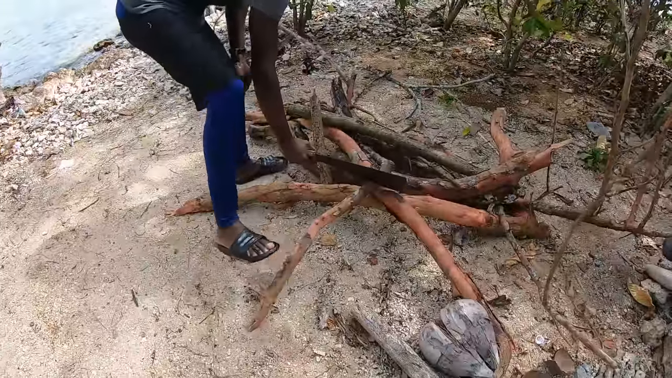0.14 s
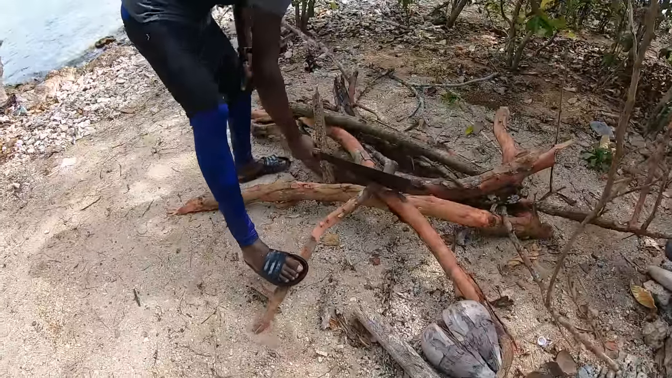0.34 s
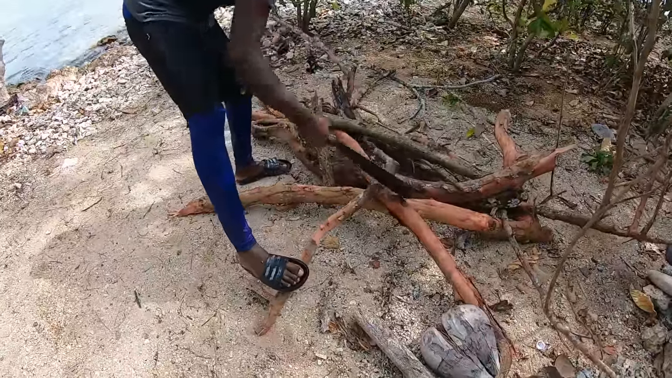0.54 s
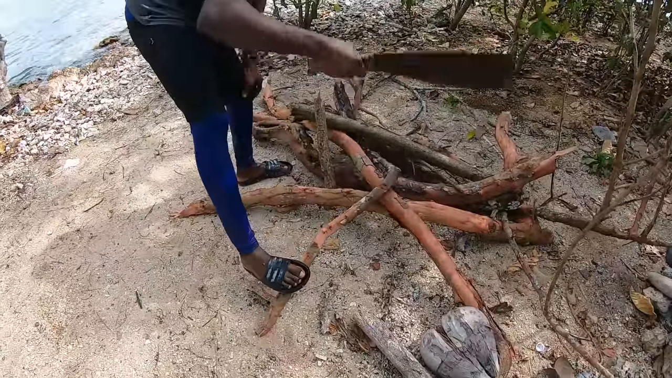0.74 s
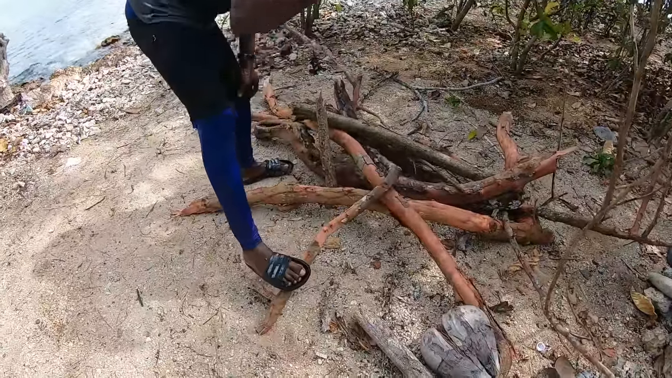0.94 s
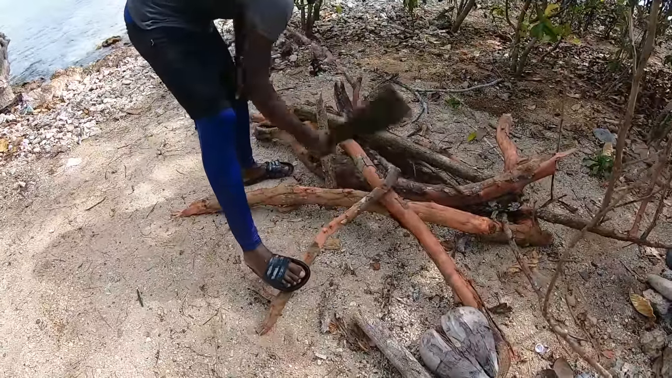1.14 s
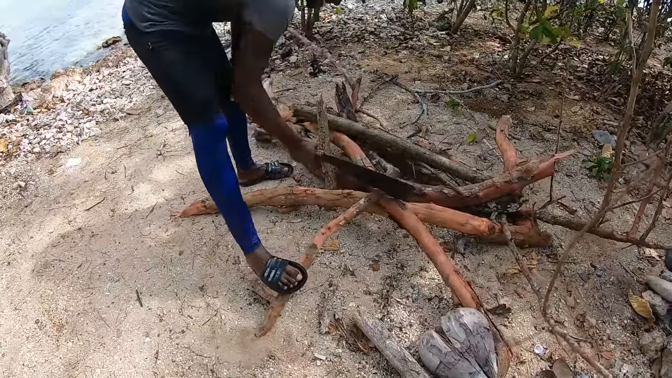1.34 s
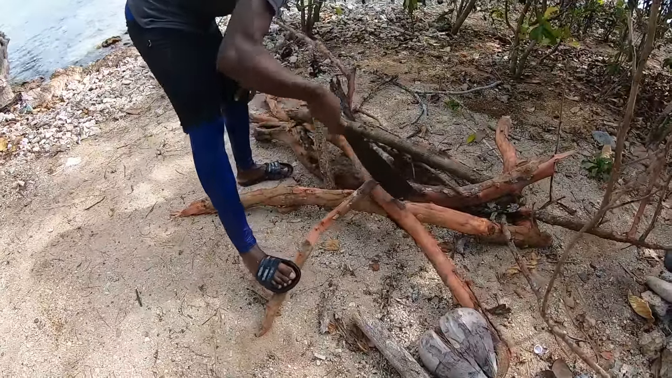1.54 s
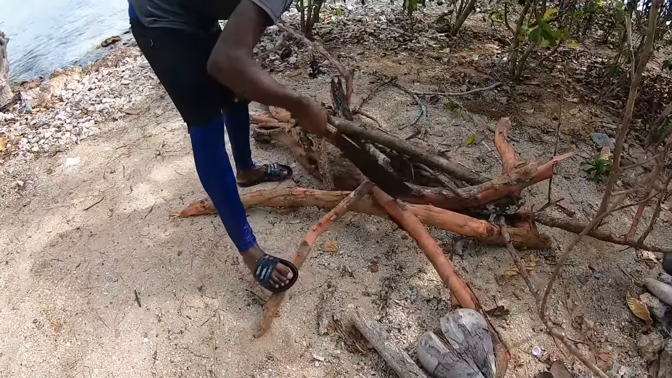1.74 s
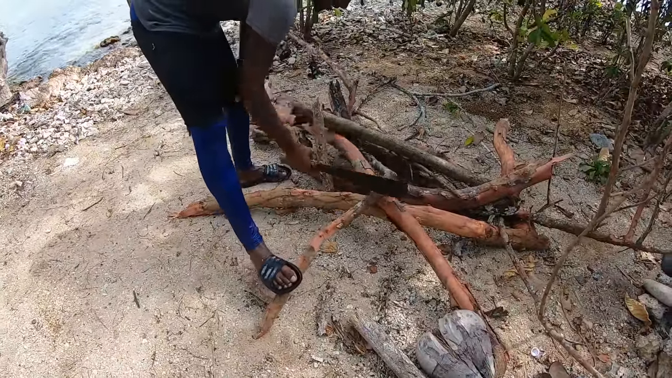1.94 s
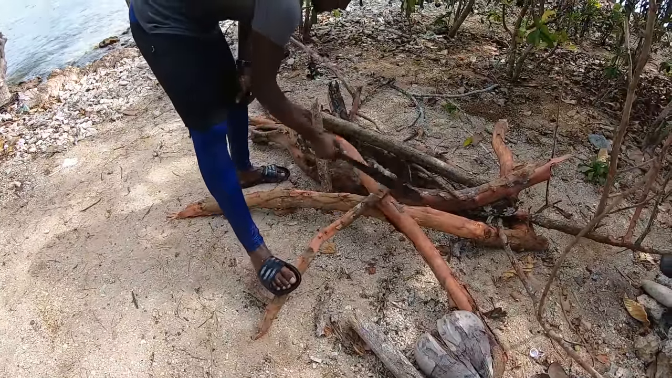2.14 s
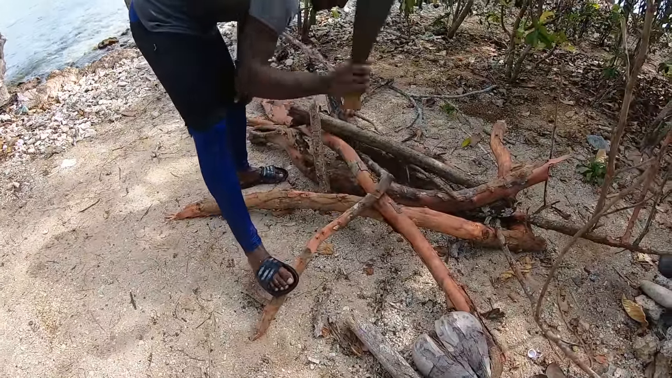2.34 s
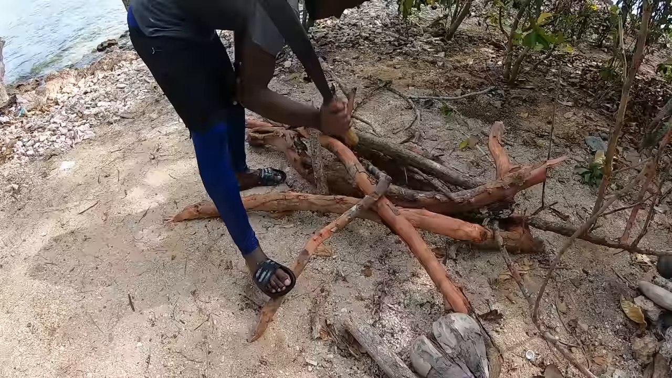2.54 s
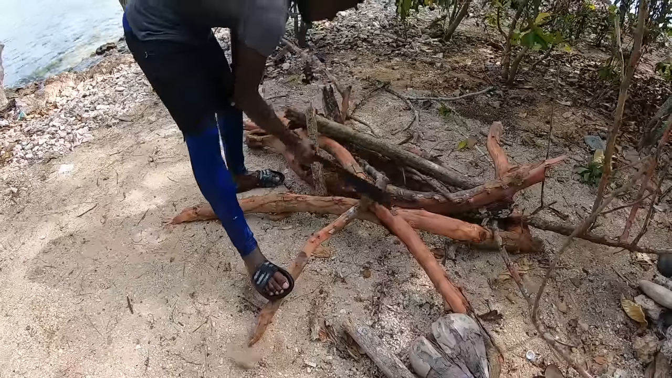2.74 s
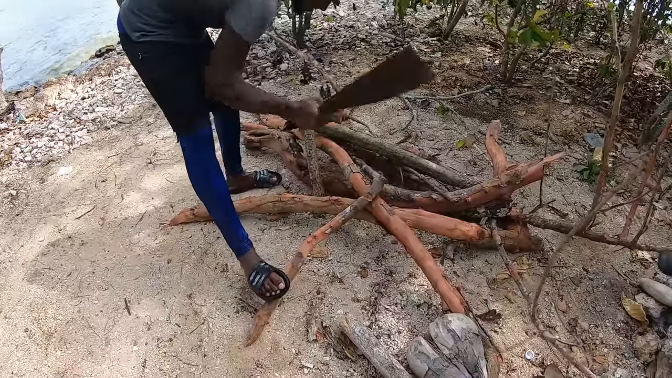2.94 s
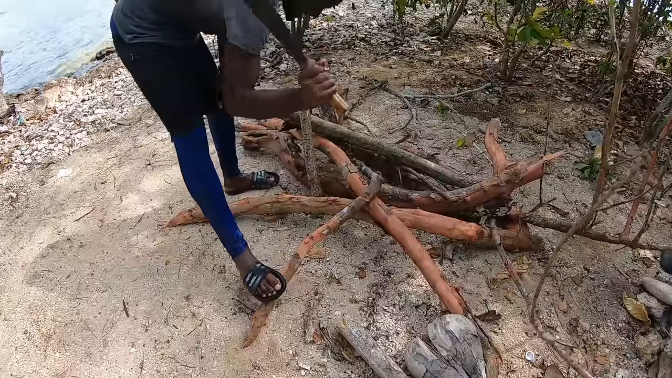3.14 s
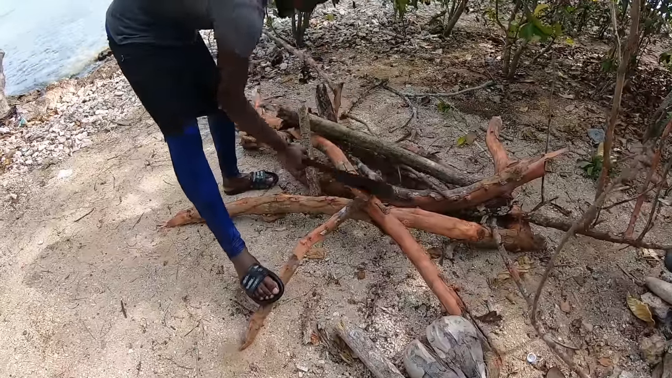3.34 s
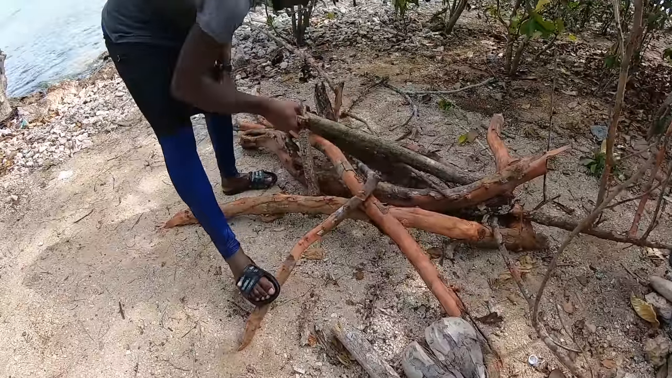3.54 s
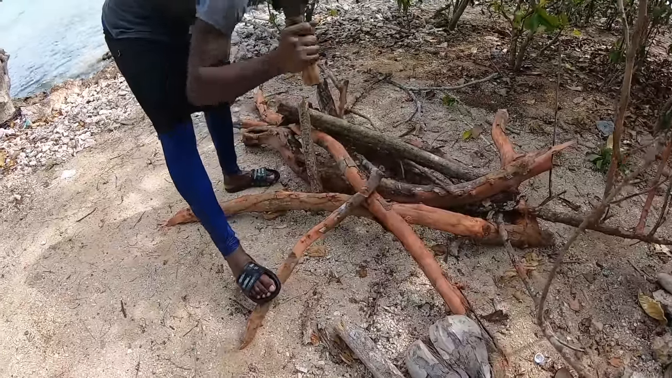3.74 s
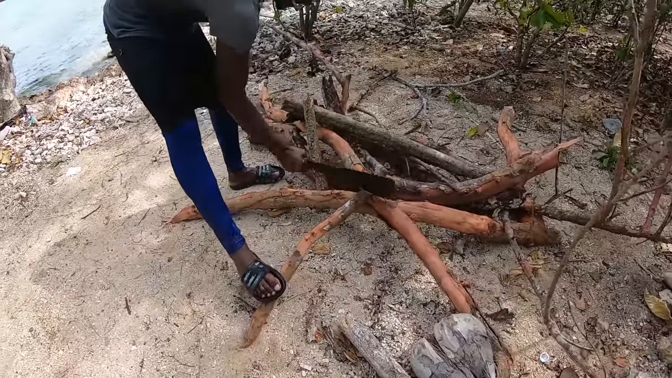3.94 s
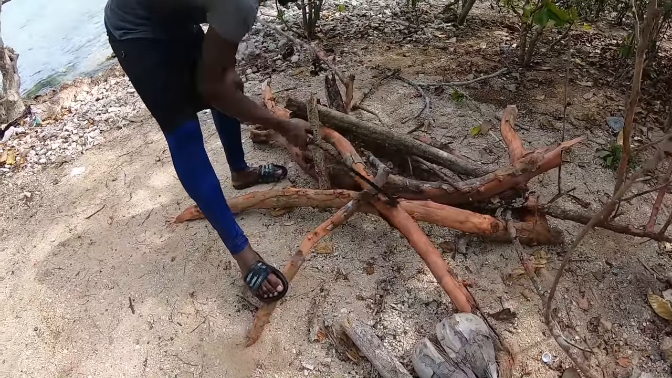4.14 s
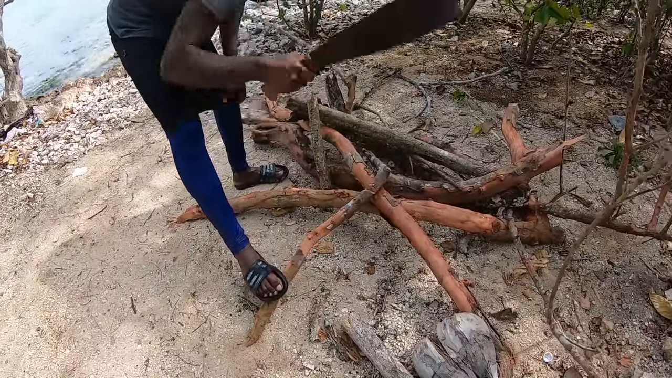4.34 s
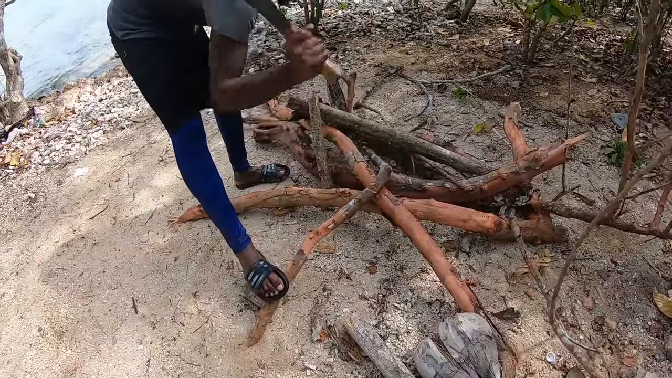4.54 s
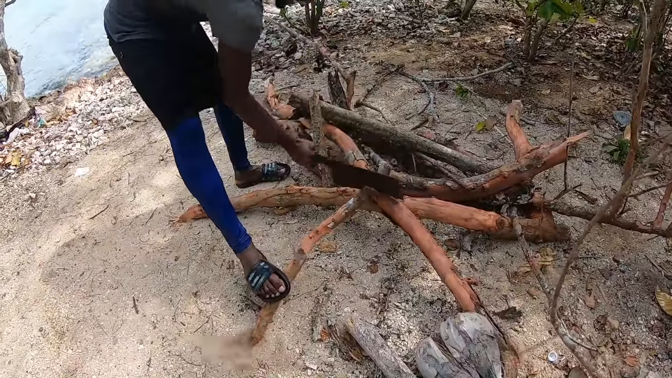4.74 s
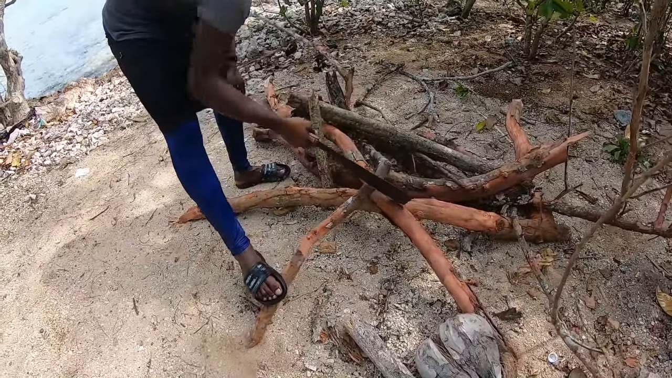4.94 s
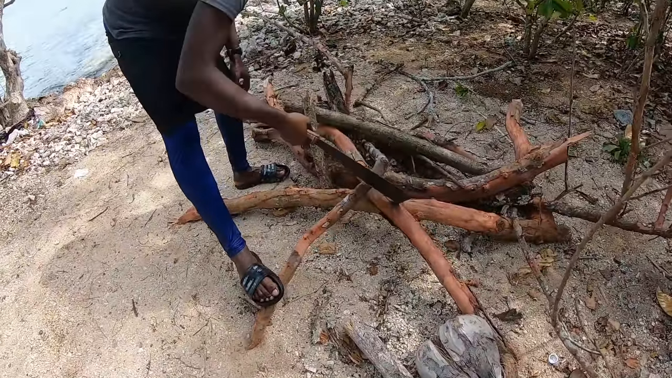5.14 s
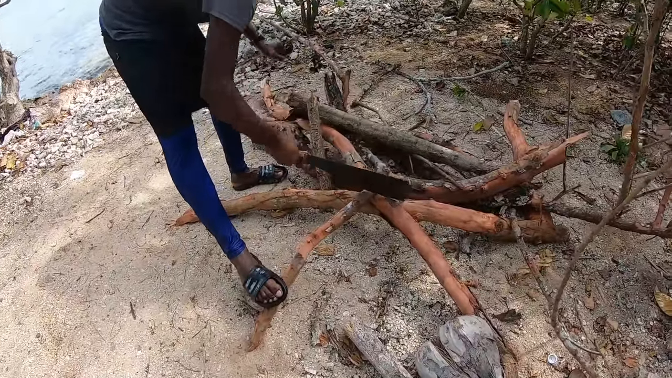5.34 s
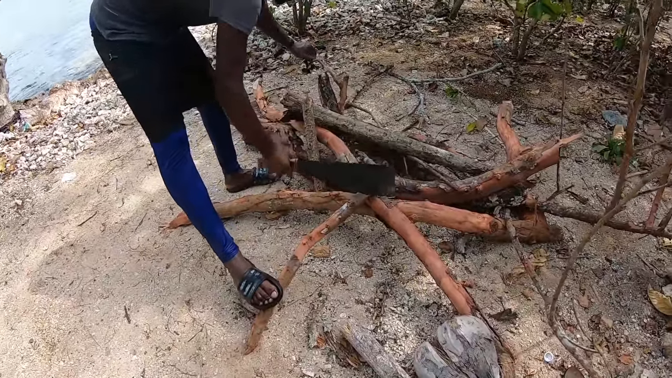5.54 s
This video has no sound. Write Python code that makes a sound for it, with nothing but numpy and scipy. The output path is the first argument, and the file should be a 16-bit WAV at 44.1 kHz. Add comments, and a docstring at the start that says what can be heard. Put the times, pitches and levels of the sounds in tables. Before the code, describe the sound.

Dry branches are handled on a sandy shore, about two metres from the microphone. For the first second twigs tick and snap, with wooden knocks near 0.2 and 0.7 seconds. At 1.3 seconds a machete lands a loud chop: a sharp crack, a woody knock, a low thud and a very short metallic ring. Faint ticks, a tap and light scrapes of steel on bark follow until about 2.3 seconds. Four strong, evenly spaced chops come at 2.7, 3.4, 4.1 and 4.8 seconds, the second with an especially bright crack. Each rings briefly, scatters chips and stirs the leaves. Small snaps and taps fall between them, and a lighter knock comes at 5.5 seconds. Faint surf, leaf rustle and low wind rumble run underneath. The sound starts almost centred and widens to stereo after two seconds, with the chopping slightly left.

```python
"""On a sandy shore, a machete chops a pile of dry branches two metres from a pair of microphones.
Each stroke excites damped modes of the wood, the ground and the steel, while breaking fibres and
flying chips radiate broadband noise. Twigs tick and the blade scrapes bark over surf, leaves and wind.
The sound starts almost centred and slowly opens to stereo after two seconds."""
import sys
import numpy as np
from scipy import signal
from scipy.fft import rfft, irfft, next_fast_len
from scipy.io import wavfile
from scipy.ndimage import uniform_filter1d

SR = 44100
rng = np.random.default_rng(int(sys.argv[2]) if len(sys.argv) > 2 else 0)


def put_to_file(sound):
    """Save the sound as 16-bit audio at rate SR, in the file named by the first command-line argument."""
    columns = np.atleast_2d(sound).T  # one column per channel
    safe = np.clip(columns, -1, 1)
    whole_steps = np.round(safe * 32767)
    wavfile.write(sys.argv[1], SR, whole_steps.astype(np.int16))


N = 246078

# noise spectra (frequency [Hz], relative spectral density [dB])
SURF_SPECTRUM = [(53, -25), (90, -7.5), (170, 7), (320, -1), (600, -3), (1200, -5), (2340, -10.5),
                 (5000, -24.5), (9700, -37), (15600, -72)]
LEAF_SPECTRUM = [(1500, -36), (3000, 6.5), (5000, -2), (6500, -1), (8500, -3.5), (11000, -5.5),
                 (15500, -21)]
WIND_SPECTRUM = [(20, -24), (40, -6.5), (68, -0.5), (95, -4.5), (200, -18), (400, -61)]
SWELL_SPECTRUM = [(410, -38), (700, -16), (1050, -38), (1550, -1.5), (2310, -19.5), (2600, -8.5),
                  (3200, -18.5), (4040, -15), (4790, -28), (7450, -5), (9530, -17), (10000, -23),
                  (11300, -9), (15600, -42)]
CRACK_SPECTRUM = [(700, -11), (1200, -5), (2500, -13.5), (3400, -7), (5100, -9), (6800, -16), (8000, -14.5),
                  (9600, -12.5), (11000, -18), (15600, -24)]
CHIP_SPECTRUM = [(470, -53), (800, -9), (2000, 0), (3100, -5), (6000, -3.5), (9400, -3.5), (11000, -7),
                 (15600, -19)]
# background envelopes (time [s], surf level [dB], leaf level [dB])
SHORE_LEVELS = [(0, -42.5, -55), (.64, -41, -51), (.74, -37.5, -41.5), (.93, -42.5, -54.5),
                (1.25, -42, -53.5), (1.45, -48, -56.5), (2.02, -46, -55), (2.25, -47, -59.5),
                (2.7, -46, -57), (3.01, -49, -64), (3.3, -47.5, -57.5), (3.6, -47.5, -57.5),
                (4.05, -44.5, -54), (4.27, -53.5, -65), (4.75, -46, -54.5), (4.98, -53, -61),
                (5.3, -53, -56.5), (5.58, -47, -54.5)]
# wind on the microphones (time [s], level [dB])
GUSTS = [(0, -46), (.2, -54.5), (.8, -49.5), (1.04, -45), (1.17, -40), (1.36, -59.5), (2.0, -51),
         (2.3, -58), (2.43, -44), (2.55, -40), (2.68, -54), (3.1, -49), (3.35, -56), (3.9, -55),
         (4.2, -48.5), (4.45, -59.5), (5.0, -62.5), (5.58, -53)]
# spells of handling (start [s], end [s], ticks [count], typical level [dB], typical frequency [Hz])
HANDLING = [(0, 0.899, 26, -42, 3000), (1.501, 2.597, 7, -47.5, 4000), (3.556, 4.7, 6, -46, 7000),
            (5.05, 5.403, 10, -46.5, 8500)]
# the loudest snaps and ticks, including the bright top of the third chop's crack
# (time [s], level [dB], centre frequency [Hz], T60 [s])
SNAPS = [(0.1443, -30.5, 3830, 0.037), (.269, -33.5, 2320, .03), (.346, -34, 2330, 0.13),
         (0.353, -33.5, 5750, 0.082), (.385, -29, 2470, 0.034), (.399, -30, 1800, 0.087),
         (0.4511, -33, 1950, .021), (0.569, -38.5, 9000, .046), (.608, -37, 3000, 0.02),
         (.624, -35, 2940, 0.035), (.694, -36, 3460, 0.066), (.727, -32.5, 5000, .05),
         (0.785, -29, 3270, 0.067), (.8362, -33.5, 3870, .05), (1.628, -41, 3940, 0.027),
         (1.789, -41, 1470, 0.04), (2.018, -39.5, 2960, 0.08), (2.9498, -37.5, 1640, 0.023),
         (3.3834, -10.5, 8700, 0.03), (3.573, -35, 3280, 0.02), (4.145, -34, 3260, 0.039),
         (4.169, -38, 3080, .03), (4.2624, -41, 3300, 0.031), (4.9821, -31.5, 7040, .028),
         (4.995, -40.5, 2180, 0.063), (5.013, -41, 7000, .03), (5.0235, -33.5, 7200, .028),
         (5.379, -37, 9200, .023), (5.447, -40.5, 7400, 0.1), (5.4755, -34.5, 2540, 0.032),
         (5.5, -41.5, 3900, .04)]
# the blade drags over bark (start [s], duration [s], frequency [Hz], level [dB])
SCRAPES = [(0.715, 0.018, 6300, -36), (1.547, 0.026, 2700, -50.5), (1.915, 0.088, 2980, -53.5),
           (1.997, 0.034, 5340, -57), (2.167, 0.056, 5350, -57), (2.19, 0.065, 2700, -52)]
# hiss just before two of the loud hits (end [s], duration [s], final level [dB])
SWELLS = [(1.294, .028, -12.5), (2.752, 0.031, -22)]
# modes of the pile on the sand, the steel and the branches (frequency [Hz], level [dB], T60 [s])
GROUND_MODES = [(50.6, -20.5, 0.32), (82, -18.5, 0.23), (123, -11.5, 0.19), (156, 0.5, 0.11),
                (186.5, 2, 0.084)]
BLADE_MODES = [(1448, 8, .11), (1828, -3, .25), (2654, -1, .2), (3047, -2, .35), (3520, -6, .2),
               (4670, -6, .3), (5045, -8, .3), (5930, -5, .25), (7005, -4, .3), (8850, -8, .12)]
WOOD_MODES = [(215, -1, .06), (262, 0, .07), (325, 0, .065), (414, 1, .065), (480, -4, .05),
              (566, -1, .075), (657, -3, .07), (768, -3, .07), (878, -1, .07), (1035, -3, .05),
              (1135, 0, .05), (1290, -3, .035), (1450, 0, .05), (1706, -2, .035), (1832, -2, .035),
              (2100, -5, .025), (2560, -3, .025)]
# reflections from nearby trunks and the bank (delay [ms], gain [dB])
ECHOES = [(15.5, -30.5), (23.0, -17.5)]
# taps and branches dropping back (time [s], knock gain [dB], thud gain [dB], crack gain [dB],
# branch pitch [Hz], roll-off around that pitch [dB/octave], rattle time constant [ms])
TAPS = [(0.154, -14.5, -25, -30.5, 423, 11, 6.8), (.646, -29.5, -46, -50, 408, 25, 5.1),
        (0.7037, -9.5, -17.5, -30, 810, 5.5, 8), (2.041, -24.5, -29, -65, 633, 2.5, 6.7),
        (2.816, -35.5, -38, -51, 393, 17, 4.6), (4.131, -28, -34, -53, 566, 19, 3.8),
        (4.219, -22.5, -43, -39, 590, 14, 1.9), (5.476, -15.5, -45, -38, 606, 10, 5.1)]
# full strokes (the columns of TAPS, hum gain [dB], gain of the other blade modes [dB], free ringing [s])
CHOPS = [(1.2952, -2, -15.5, -9, 1300, 1, 0.92, -32.5, -42.5, 0.077),
         (2.7449, -12, -14, -7, 597, 1.5, 8.4, -45.5, -34.5, .18),
         (3.3834, -5.5, -15.5, -12, 388, 6, 4.6, -51, -43, 0.15),
         (4.074, -7.5, -14, -5.5, 410, 6.5, 9.5, -35.5, -47, 0.096),
         (4.7944, -5, -16, -6.5, 1100, 0.5, 4.1, -42, -44, .12)]
# side against mid in diffuse sound (frequency [Hz], gain [dB])
DIFFUSE_SIDE = [(60, -17), (200, -21.5), (500, -11), (1200, -3.5), (4000, -5), (12000, 1.5)]
# response of the capsules (frequency [Hz], gain [dB])
CAPSULE_RESPONSE = [(20, -13), (45, -1), (80, 1), (9500, -2), (11000, -9), (14300, -11.5), (15500, -22)]
# interference dips when spaced microphones are summed (frequency [Hz], gain [dB])
SUM_RESPONSE = [(5000, 1.5), (6200, -6.5), (7500, -2.5), (9500, -4.5), (10200, -5.5), (11000, 0)]
# opening from centre to stereo (time [s], side gain [ratio])
STEREO_WIDTH = [(0, 0.014), (1.95, 0.0039), (2.2, 0.3), (2.6, 0.67), (3.2, 0.99), (4.2, 1.16), (5.58, 1.12)]

PILE_PAN_DB, SNAP_PAN_DB = -3.5, -5.5  # left minus right
STIR_DB, STIR_T60_S = -49.5, 1.3
TICK_T60_S, TICK_SCATTER_DB, TICK_SCATTER_OCT = 0.02, 1, 0.35
HUM_HZ, HUM_T60_S = 2205, 1.0  # the blade's clearest mode
THUD_RISE_S, CRACK_RISE_S = 0.0095, 0.00084
CRACK_T60_S, TEAR_T60_S, TEAR_DB = 0.02, 0.083, -11
CHIP_DB, CHIP_DB_PER_CRACK_DB, CHIP_T60_S = -32.5, 0.48, 0.54
SETTLE_DB, SETTLE_MS = -21, 72  # the pile goes on shifting faintly
TREBLE_MIN_WIDTH, TREBLE_HZ, CUTOFF_HZ = 0.47, 11200, 15600


def undb(db):
    """Amplitude ratio of a level in decibels."""
    return 10 ** (np.asarray(db, float) / 20)


def unit(x):
    """Normalisation to an rms of 1."""
    return x / np.sqrt(np.mean(x ** 2))


def colour(x, points):
    """Zero-phase filtering by (frequency [Hz], gain [dB]) points joined on a log-frequency axis."""
    hz, db = np.transpose(points)
    size = next_fast_len(x.shape[-1])
    bins = np.maximum(np.arange(size // 2 + 1) * SR / size, 1)
    gain = undb(np.interp(np.log(bins), np.log(hz), db))
    return irfft(rfft(x, size) * gain, size)[..., :x.shape[-1]]


def fade(t, t60):
    """Exponential damping: 60 dB lost in t60 seconds."""
    return np.exp(-np.log(1000) * t / max(t60, .002))


def ring(t, modes, scatter_db, detune):
    """Modal superposition: each blow lands elsewhere, so the modes vary in strength and sign."""
    draws = rng.standard_normal((len(modes), 3))
    out = 0
    for (hz, db, t60), (polarity, strength, shift) in zip(modes, draws):
        amplitude = np.sign(polarity) * undb(db + scatter_db * strength)
        out += amplitude * fade(t, t60) * np.sin(2 * np.pi * hz * (1 + detune * shift) * t)
    return out


def flicker(rate_hz):
    """Random modulation: steps at the given rate, smoothed twice, with an rms of 1."""
    hold = int(SR / rate_hz)
    steps = np.repeat(rng.standard_normal(N // hold + 1), hold)
    return unit(uniform_filter1d(uniform_filter1d(steps, hold), hold)[:N])


def grit(length, spread_db):
    """Heavy-tailed noise: two independent channels of dense, uneven grains."""
    noise = rng.standard_normal((2, length))
    return unit(noise * undb(spread_db * np.minimum(rng.exponential(size=noise.shape), 6)))


def spread(mid, other):
    """Partial coherence: an independent side signal makes left and right differ."""
    side = colour(other, DIFFUSE_SIDE)
    return np.array([mid + side, mid - side])


def add(out, start_s, sound, pan_db):
    """Superposition of a sound at its start time, placed by a level difference between channels."""
    i = int(start_s * SR)
    sound = np.atleast_2d(sound)[:, :N - i]
    out[:, i:i + sound.shape[1]] += sound * undb([[pan_db / 2], [-pan_db / 2]])


def surf(t):
    """Breaking water radiates broadband noise whose octaves fluctuate slightly and independently."""
    times, levels, _ = np.transpose(SHORE_LEVELS)
    wash = colour(grit(N, spread_db=0.5), SURF_SPECTRUM)
    water = 0
    for hz in 100 * 2. ** np.arange(8):
        octave = [(hz / 2, -40), (hz / 1.515, -6), (hz, 0), (hz * 1.59, -6), (hz * 2, -40)]
        water += undb(0.26 * flicker(10)) * colour(wash, octave)
    return undb(np.interp(t, times, levels)) * spread(*unit(water))


def leaves(t):
    """Incoherent sources add in power: a background rustle and the shaking from each full stroke."""
    times, _, levels = np.transpose(SHORE_LEVELS)
    stir = sum((t > s) * fade(np.maximum(t - s, 0), STIR_T60_S) ** 2 for s, *_ in CHOPS)
    power = undb(np.interp(t, times, levels)) ** 2 + undb(STIR_DB) ** 2 * stir
    rustle = undb(flicker(40)) * colour(grit(N, spread_db=3), LEAF_SPECTRUM)
    return np.sqrt(power) * spread(*unit(rustle))


def wind(t):
    """Turbulent pressure on the microphones gives a low rumble that follows the gusts."""
    rumble = undb(1.5 * flicker(9)) * colour(rng.standard_normal((2, N)), WIND_SPECTRUM)
    return undb(np.interp(t, *np.transpose(GUSTS))) * spread(*unit(rumble))


def ticks():
    """Jittered timing: one faint tick in each equal slot of a handling spell, as rows like SNAPS."""
    rows = []
    for start, end, count, db, hz in HANDLING:
        times = start + (end - start) * (np.arange(count) + rng.random(count)) / count
        for s, (strength, shift) in zip(times, rng.standard_normal((count, 2))):
            centre_hz = hz * 2 ** (TICK_SCATTER_OCT * shift)
            rows.append((s, db + TICK_SCATTER_DB * strength, centre_hz, TICK_T60_S))
    return rows


def snaps():
    """Brittle fracture gives short, broad bands of gritty noise: twigs, and the top of one chop's crack."""
    out, t = np.zeros((2, N)), np.arange(SR // 5) / SR
    for s, db, hz, t60 in SNAPS + ticks():
        band = [(hz / 4, -20), (hz / 2, -7), (hz, 0), (hz * 1.5, -8), (hz * 3, -24), (hz * 8, -50)]
        burst = unit(colour(grit(len(t), spread_db=3), band))
        envelope = (1 - np.exp(-t / (0.02 * t60))) * fade(t, t60)
        add(out, s, undb(db) * envelope * spread(burst[0], .5 * burst[1]), SNAP_PAN_DB)
    return out


def scrapes():
    """Friction of steel on bark sings in a narrow band of noise that rises and falls."""
    out = np.zeros((2, N))
    for s, duration, hz, db in SCRAPES:
        band = [(hz * .8, -30), (hz * .96, -3), (hz, 0), (hz * 1.04, -3), (hz * 1.2, -30)]
        song = unit(colour(rng.standard_normal(SR // 5), band))
        envelope = np.hanning(int(duration * SR))
        add(out, s, undb(db) * envelope * song[:len(envelope)], pan_db=-3)
    return out


def swells():
    """Power-law growth: a short hiss swells just before two of the loud hits."""
    out = np.zeros((2, N))
    for end, duration, db in SWELLS:
        growth = np.linspace(0, 1, int(duration * SR)) ** 1.4
        hiss = unit(colour(rng.standard_normal((2, SR // 10)), SWELL_SPECTRUM))[:, :len(growth)]
        add(out, end - duration, undb(db) * growth * spread(hiss[0], .4 * hiss[1]), pan_db=-3)
    return out


def ground_thud(t):
    """The pile thumps the sand, exciting low damped modes with a soft onset."""
    onset = 1 - np.exp(-(t / THUD_RISE_S) ** 2)
    return onset * ring(t, GROUND_MODES, scatter_db=3, detune=0.018)


def blade(t, hum_db, modes_db, free_s):
    """Free vibration of the steel, shuddering in the cut until the hand or the wood damps it."""
    grip = fade(np.maximum(t - free_s, 0), t60=0.029)
    hum = undb(hum_db) * fade(t, HUM_T60_S) * np.sin(2 * np.pi * HUM_HZ * t)
    shudder = undb(3 * flicker(90)[:len(t)])
    other_modes = undb(modes_db) * shudder * ring(t, BLADE_MODES, scatter_db=1, detune=.001)
    return grip * (hum + other_modes)


def fracture(t, crack_db):
    """Fibres release strain as a crack and a slower tear; a louder crack throws a louder spray of chips."""
    onset = 1 - np.exp(-t / CRACK_RISE_S)
    envelope = onset * (fade(t, CRACK_T60_S) + undb(TEAR_DB) * fade(t, TEAR_T60_S))
    fibres = unit(colour(grit(len(t), spread_db=0.5), CRACK_SPECTRUM))
    chips = unit(colour(grit(len(t), spread_db=3.5), CHIP_SPECTRUM))
    crack = undb(crack_db) * envelope * spread(fibres[0], .5 * fibres[1])
    spray = undb(CHIP_DB + CHIP_DB_PER_CRACK_DB * crack_db) * fade(t, CHIP_T60_S) * spread(*chips)
    return crack + spray


def branch_knock(t, pitch_hz, rolloff_db, rattle_ms):
    """Impact excites the modes near a branch's pitch; neighbours clack against it and echoes follow."""
    modes = [(hz, db - rolloff_db * abs(np.log2(hz / pitch_hz)), t60) for hz, db, t60 in WOOD_MODES]
    body, clack_t = np.zeros(len(t)), t[:SR // 10]
    for k, arrival in enumerate(rng.exponential(size=18).cumsum()):
        ms = arrival * (2 + k / 5) if k else 0  # clacks thin out with time
        strength = 0.7 * np.exp(-ms / rattle_ms) + undb(SETTLE_DB) * np.exp(-ms / SETTLE_MS) if k else 1
        i = min(int(ms * SR / 1000), len(t) - len(clack_t))
        body[i:i + len(clack_t)] += strength * ring(clack_t, modes, scatter_db=1.5, detune=0.018)
    body *= 1 - np.exp(-t * 1000 / (0.12 * rattle_ms))  # a loose branch gives way before it rings
    for ms, db in ECHOES:
        body += undb(db) * np.append(np.zeros(int(ms * SR / 1000)), body)[:len(t)]
    onset_rms = np.sqrt(np.mean(body[:SR // 100] ** 2))
    return body / onset_rms / 3


def blows():
    """Each impact drives wood and ground together; the full strokes also ring the steel."""
    out, t = np.zeros((2, N)), np.arange(SR // 2) / SR
    for s, knock_db, thud_db, crack_db, pitch_hz, rolloff_db, rattle_ms, *steel in CHOPS + TAPS:
        knock = undb(knock_db) * branch_knock(t, pitch_hz, rolloff_db, rattle_ms)
        thud = undb(thud_db) * ground_thud(t)
        add(out, s, knock + fracture(t, crack_db), PILE_PAN_DB)
        add(out, s, thud, 0.24 * PILE_PAN_DB)  # long waves reach both microphones nearly alike
        if steel:
            add(out, s, blade(t, *steel), PILE_PAN_DB)
    return out


def scene():
    """Linear superposition of all sources at the two microphones."""
    t = np.arange(N) / SR
    return blows() + swells() + snaps() + scrapes() + surf(t) + leaves(t) + wind(t)


def record(dry):
    """Mid-side mixing opens the capsules' sound to stereo; peaks are limited and the top is cut."""
    left, right = colour(dry, CAPSULE_RESPONSE)
    mid, side = (left + right) / 2, (left - right) / 2
    width = np.interp(np.arange(N) / SR, *np.transpose(STEREO_WIDTH))
    stereo_share = np.clip(width, 0, 1)
    mid = stereo_share * mid + (1 - stereo_share) * colour(mid, SUM_RESPONSE)
    treble = signal.sosfilt(signal.butter(6, TREBLE_HZ, "high", fs=SR, output="sos"), side)
    side = width * side + np.maximum(TREBLE_MIN_WIDTH - width, 0) * treble  # the top starts out wide
    limited = np.clip([mid + side, mid - side], -1, 1)
    return signal.sosfilt(signal.ellip(10, .2, 80, CUTOFF_HZ, fs=SR, output="sos"), limited)


dry = scene()
out = record(dry)
put_to_file(out)
```